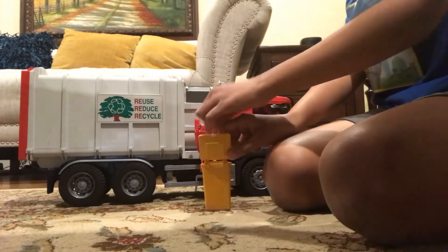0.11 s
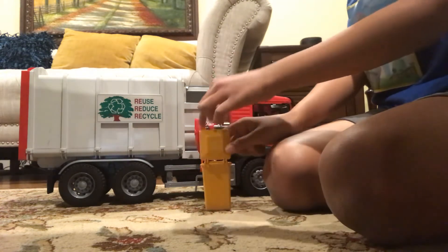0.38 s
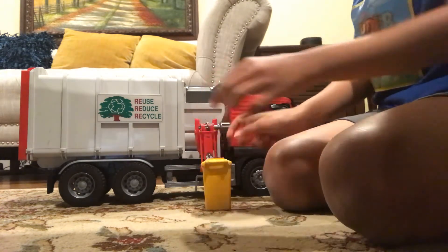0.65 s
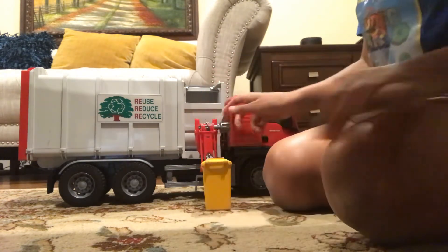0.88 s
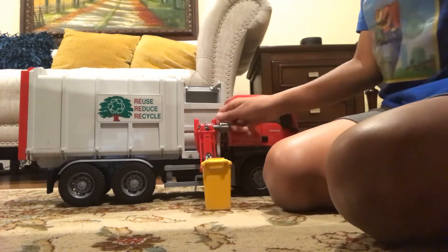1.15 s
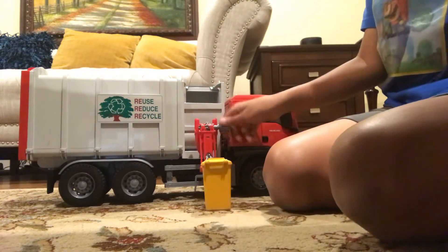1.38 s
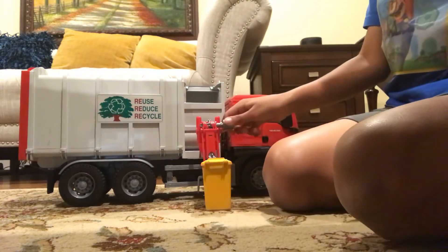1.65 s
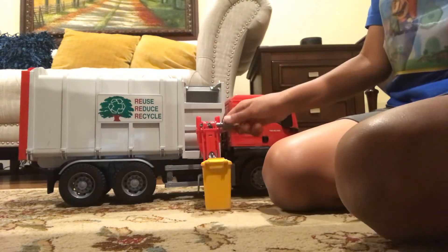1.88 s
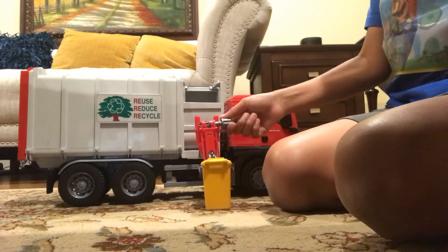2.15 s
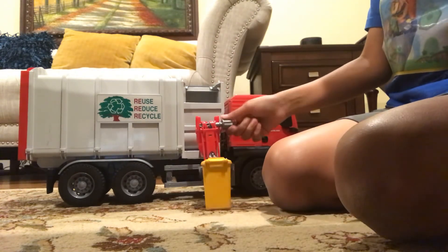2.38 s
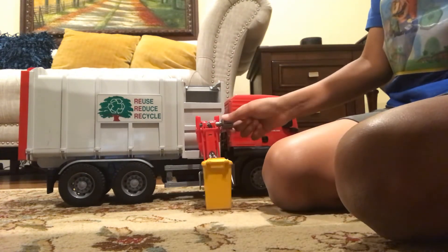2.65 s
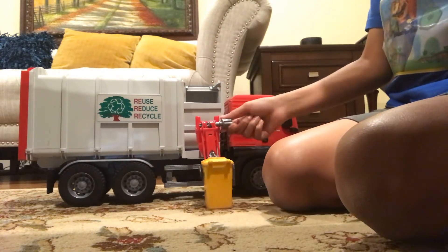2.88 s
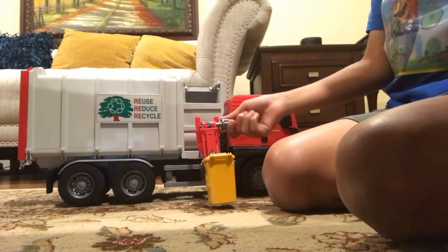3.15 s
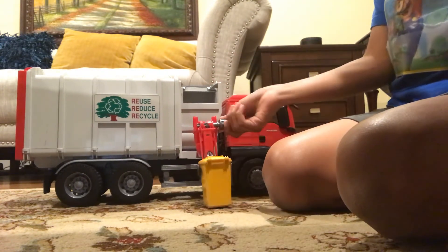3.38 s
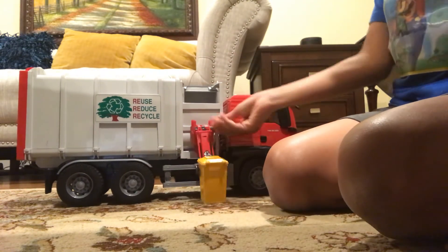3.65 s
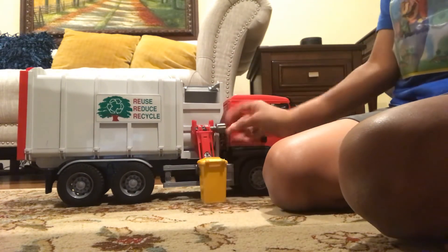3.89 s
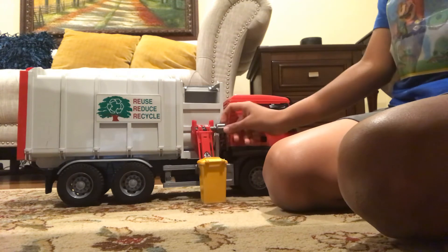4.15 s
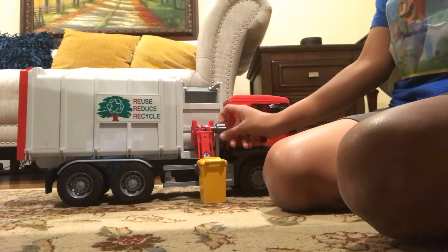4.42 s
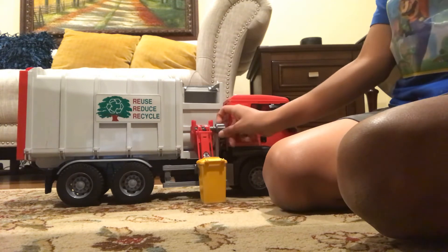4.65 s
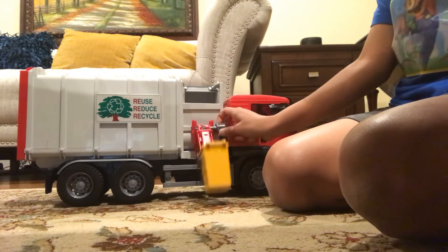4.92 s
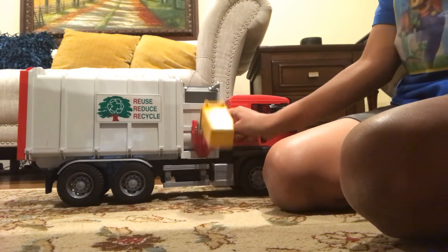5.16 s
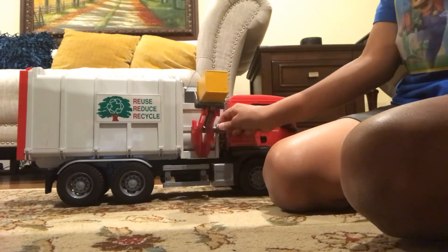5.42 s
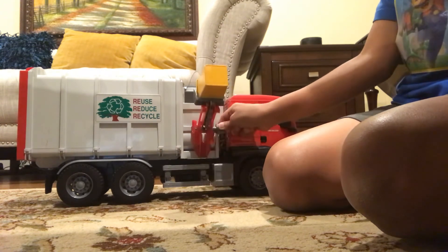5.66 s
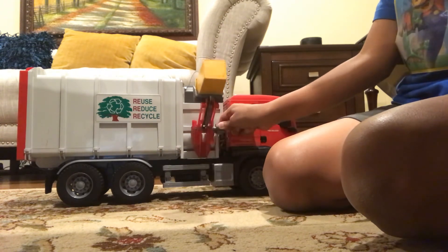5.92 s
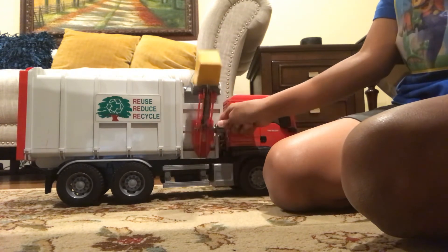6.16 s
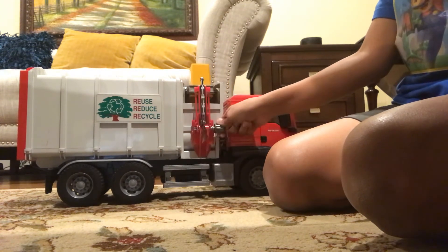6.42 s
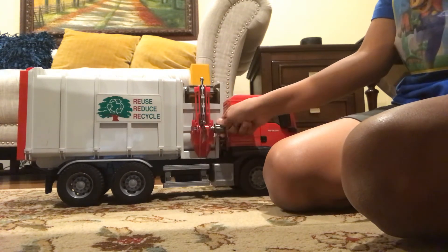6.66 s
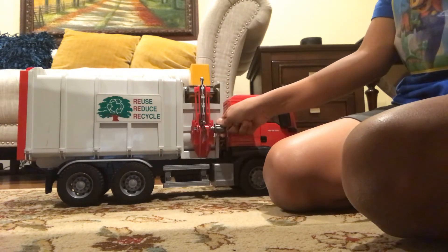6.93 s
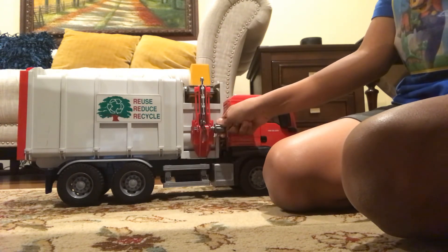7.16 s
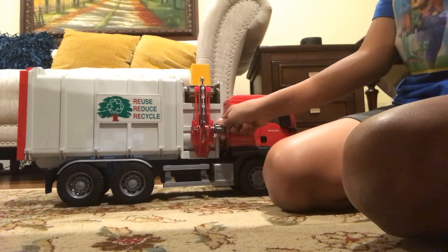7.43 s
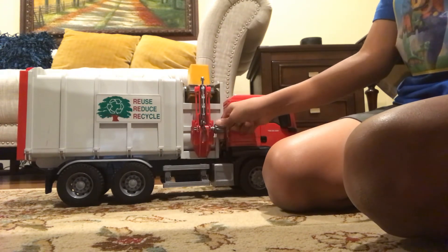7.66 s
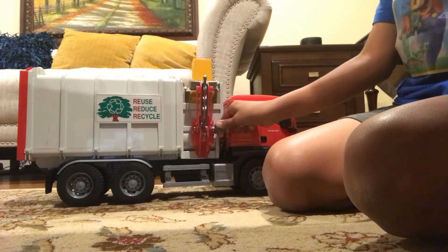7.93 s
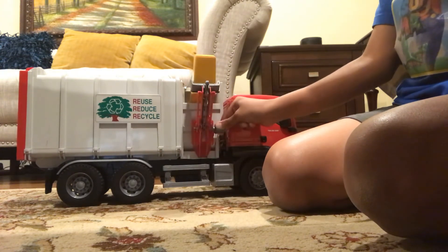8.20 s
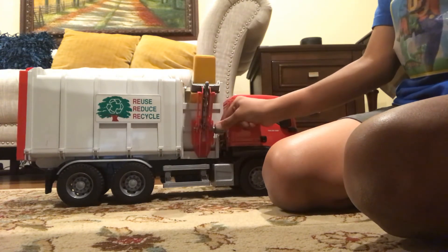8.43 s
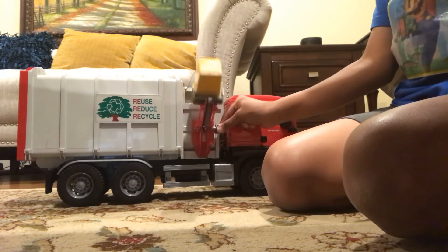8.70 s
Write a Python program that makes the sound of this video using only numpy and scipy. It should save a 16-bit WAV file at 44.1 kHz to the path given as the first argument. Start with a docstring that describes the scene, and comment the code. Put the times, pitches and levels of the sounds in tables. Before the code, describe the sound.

Quiet indoor hum, a faint squeak and lid snap, clusters of dry plastic knocks, then one loud bin slam on a hollow toy truck, and loose rattling.

```python
"""Room hum and hiss come first, then squeaks, a rattle and the snap of a lid, in a furnished living room.
A child works the lifting arm of a plastic toy refuse truck on a carpet: the arm knocks on the hollow body,
the bin slams on the hopper, loose pieces tick and slide; hands rub, with brief drones, pings and a thump.
Hits are runs of small contacts into decaying modes and noise cracks; rubs and drones are filtered noise.
The microphone hears the toy directly, over a softer room tail and steady noise."""
import sys
import numpy as np
from scipy import signal
from scipy.fft import rfft, irfft
from scipy.io import wavfile

SR = 44100
rng = np.random.default_rng(int(sys.argv[2]) if len(sys.argv) > 2 else 0)


def amplitude_ratio(level_db):
    """Convert a level in decibels to the matching linear amplitude (field) ratio."""
    exponent = np.asarray(level_db, float) / 20
    return 10 ** exponent


def transcribe(signal):
    """Save signal, clipped to [-1, 1], as a 16-bit WAV file at the path in sys.argv[1]."""
    frames = np.atleast_2d(signal).T
    limited = np.clip(frames, -1, 1)
    pcm = np.round(limited * 32767).astype(np.int16)
    wavfile.write(sys.argv[1], SR, pcm)


N = 388521

# Arm knocking on the truck. Each row: start in seconds, nominal peak in dB, hardness of the contact in dB.
KNOCKS = [(1.982, -52, -2), (2.032, -52, -5), (2.064, -37.5, -8.5), (2.645, -52, -2.5), (2.795, -48.5, 0),
          (2.833, -48.5, 6), (2.956, -44.5, 6.5), (3.198, -42.5, -3), (3.222, -41.5, 2), (3.267, -50.5, 1),
          (3.307, -38, 12), (3.399, -57.5, 11), (3.857, -42, -9.5), (3.873, -43.5, 3.5), (3.888, -34, 3),
          (3.928, -44, 5.5), (3.972, -28, 0.5), (3.981, -29, 8), (3.99, -33.5, 14), (4.101, -39.5, 5),
          (4.115, -44, 11), (4.14, -49.5, 3), (4.268, -43.5, -4), (4.42, -41.5, -7.5), (5.071, -50, -12),
          (5.159, -48.5, 2.5), (5.255, -60, 2.5), (5.701, -56.5, -8), (8.008, -55.5, -20),
          (8.161, -51.5, 0), (8.193, -50.5, -3), (8.488, -46.5, -4.5), (8.576, -47, -12.5)]
# Raised bin slamming on the hopper rim and bouncing. Each row: start in seconds, nominal peak in dB, hardness in dB.
SLAMS = [(6.612, -36.5, 9), (6.689, -15.5, 0.7), (6.712, -21.5, 0.6), (6.831, -21.5, -5), (6.853, -33.5, 2),
         (6.965, -47, -1.5)]
# Bin lid snapping shut and bouncing. Each row: start in seconds, nominal peak in dB, hardness in dB.
LID_SNAPS = [(0.668, -42, -1), (0.7438, -57, 0)]
# Single taps on the bin, set down and tipped. Each row: start in seconds, nominal peak in dB, hardness in dB.
BIN_TAPS = [(0.963, -39.5, 0), (6.101, -49.5, 6.5)]
# Ticks of the loose pieces. Each row: start in seconds, nominal peak in dB, hardness in dB.
TICKS = [(3.349, -60, 6), (5.8297, -62.5, -4), (5.898, -62.5, -16), (5.96, -60.5, -16), (6.004, -51.5, -1),
         (6.027, -60, 3), (6.0748, -55, 5), (6.093, -58.5, -2), (6.139, -48, 4), (6.157, -51.5, 4),
         (6.9431, -50, -11), (7.0502, -51, 0), (7.0608, -35.5, 10.5), (7.1098, -41.5, 9.5),
         (7.149, -53, -5), (7.1704, -43.5, 6), (7.199, -54, 8), (7.217, -57, 8), (7.232, -57, 0),
         (7.273, -62.5, 4), (7.334, -52.5, -6)]

# Modes; ring() lengthens any decay under 3 ms to 3 ms.
# Hollow body, arm and bin. Each row: frequency in Hz, relative level in dB, t60 in seconds.
BODY = [(218, 2.5, 0.057), (309, 1.5, 0.039), (425.3, -5.5, 0.13), (603.4, -9.5, 0.051),
        (720, -12.5, 0.062), (921, -17.5, 0.046), (1138, -17, 0.032), (1510, 0.5, 0.0067), (1840, 2, 0.019),
        (2380, 3, 0.0064), (2714, -15.5, 0.03), (3370, 3.5, 0.0022), (3820, 0.5, 0.015), (4590, 1.5, 0.011)]
# The lifting arm's own ring. Each row: frequency in Hz, relative level in dB, t60 in seconds.
ARM = [(1530, 1, 0.039), (1660, -9, 0.0053)]
# The hopper's own ring. Each row: frequency in Hz, relative level in dB, t60 in seconds.
HOPPER = [(618, -5, 0.032)]
# Lid. Each row: frequency in Hz, relative level in dB, t60 in seconds.
LID = [(1830, -16, 0.067), (2340, 0, 0.018), (3070, -9, 0.024), (4690, 6, 0.039), (5230, 0, 0.05),
       (5520, -4, 0.022)]
# Bin under single taps. Each row: frequency in Hz, relative level in dB, t60 in seconds.
BIN = [(345, -6.5, 0.02), (500, 2, 0.071), (608, -5, 0.037), (1530, -1.5, 0.073), (3330, -8.5, 0.035),
       (4750, -3, 0.024)]
# Loose pieces and thin bin walls. Each row: frequency in Hz, relative level in dB, t60 in seconds.
PIECES = [(740, 7.5, 0.0052), (1650, -11.5, 0.081), (1987, -12.5, 0.054), (2665, -12.5, 0.06),
          (4185, -4, 0.048), (4535, -8, 0.016), (5400, 7, 0.005), (5750, 1.5, 0.011), (8340, -6.5, 0.0025)]

# Spread of a hit over four registers, low to high.
# Each row: level beside the hit's peak in dB, share of the hardness that is added (a plain ratio).
KNOCK_COLOUR = [(-12.5, 0.037), (-1.5, 0.098), (-13, 0.95), (-28.5, 0.81)]
# Slams. Each row: level beside the peak in dB, share of hardness (a plain ratio).
SLAM_COLOUR = [(-16, 0.61), (-1.5, 0.24), (-11.5, 0.59), (-18.5, 1)]
# Lid snaps. Each row: level beside the peak in dB, share of hardness (a plain ratio).
LID_COLOUR = [(-53, 0), (-1, 0.15), (-15.5, 0.53), (-3, 0.95)]
# Bin taps. Each row: level beside the peak in dB, share of hardness (a plain ratio).
TAP_COLOUR = [(-12.5, -0.6), (-0.5, 1.55), (-12.5, -0.1), (-11.5, 3)]
# Ticks. Each row: level beside the peak in dB, share of hardness (a plain ratio).
TICK_COLOUR = [(-5.5, 0.032), (-1.5, 0), (-17, 0.87), (-7, 1)]

# Loose pieces sliding and rattling, first in the bin, from 6.6 s in the hopper.
# Each row: start in seconds, end in seconds, level in dB.
SLIDES = [(0.633, 0.85, -72.5), (5.78, 6.22, -75), (6.715, 6.837, -54.5), (6.6, 6.709, -55),
          (7.052, 7.284, -61)]
# Hands moving on the body. Each row: time in seconds, level of the rub in dB.
HANDLING = [(0, -80.5), (1.45, -82), (1.65, -59), (1.9, -74.5), (2.35, -75), (2.45, -61.5), (2.75, -73.5),
            (4.5, -65.5), (5.05, -72), (5.33, -56.5), (5.62, -67.5), (5.8, -60), (6.25, -59.5), (6.5, -80),
            (7.95, -79), (8.2, -57), (8.42, -91), (8.81, -69.5)]
# Brief narrow noises: squeaks, low rumbles, two pings of the arm at 1540 Hz, the slam's low thump.
# Each row: middle in seconds, frequency in Hz, level in dB, length in seconds.
DRONES = [(0.68, 1060, -79, 0.32), (0.823, 1110, -72, 0.049), (0.88, 1096, -68, 0.096),
          (1.636, 57, -47, 0.42), (2.676, 1540, -69, 0.044), (2.82, 1540, -63, 0.036),
          (3.561, 200, -53.5, 0.085), (5.497, 201, -51.5, 0.13), (6.857, 91, -52.5, 0.39),
          (8.228, 92, -55, 0.25), (2.103, 191, -50, 0.21), (6.717, 105.7, -41.5, 0.061)]
# Colour of room and microphone. Each row: frequency in Hz, relative level in dB per Hz.
ROOM_TONE = [(18, -37), (30, -6), (66, 7), (124, 6), (328, -6), (461, -12), (721, -12), (937, -17),
             (14400, -29), (16000, -24.5)]
# Course of the room tone. Each row: time in seconds, rms between 1 and 12 kHz in dB.
HISS = [(0, -78), (8.81, -76)]

BODY_EDGES_HZ = [160, 500, 1200, 3000, 10000]     # borders of the four registers
PIECE_EDGES_HZ = [600, 1200, 3500, 7000, 14000]   # the same for lid and pieces
FORCE_BRIGHTENS = 0.29   # dB gained in the top register for each dB above the mean hit
SPOT_DB = 2.5            # each blow lands elsewhere: spread of a mode's strength
HOPPER_FROM_S, HOPPER_T60_S = 6.6, 0.019   # from here the pieces lie in the hopper and ring no longer than this
LIGHT_BIN_DB = -37       # before that, the pieces lack its low register
# Each knock or slam shakes the truck in the hands: drive for a 0 dB hit, share of its dB, rise, fade.
SHAKE_DB, SHAKE_FOLLOWS, SHAKE_RISE_S, SHAKE_FADE_S = -41, 0.6, 0.022, 0.1
ROOM_T60_S, TREBLE_T60_S, WALL_CUT_HZ = 0.33, 0.17, 850   # decay below and above the wall cut
ROOM_DB = -6.5           # gain of the room tail
BLUR_HZ = 130            # rate of a random modulation that blurs narrow rings in the room tail


def in_time(rows):
    """Columns of a table as curves, one value a sample."""
    s, *columns = np.transpose(rows)
    return [np.interp(np.arange(N) / SR, s, c) for c in columns]


def rms_one(x):
    """Scale to rms 1."""
    return x / np.sqrt(np.mean(x ** 2) + 1e-20)


def band(x, low_hz, high_hz):
    """Second-order band-pass."""
    return signal.sosfilt(signal.butter(2, [low_hz, min(high_hz, .45 * SR)], "band", fs=SR, output="sos"), x)


def ring(clicks, hz, t60):
    """A unit click sets a decaying sine of initial height 1 ringing."""
    r = amplitude_ratio(-60 / (max(t60, .003) * SR))
    w = 2 * np.pi * hz / SR
    return signal.lfilter([0, np.sin(w)], [1, -2 * r * np.cos(w), r * r], clicks + 1e-18)


def drift(rate):
    """Slow random wander of rms 1."""
    r = np.exp(-2 * np.pi * rate / SR)
    noise = rng.standard_normal(N + SR)
    return rms_one(signal.lfilter([1], [1, -2 * r, r * r], noise)[SR:])   # the first second settles the filter


def swell(middle, length):
    """A smooth rise and fall."""
    return np.cos(np.pi * np.clip((np.arange(N) / SR - middle) / length, -.5, .5)) ** 2


def registers(hits, colour):
    """Times and four register levels of each hit: hardness recolours it, force brightens the top."""
    s, db, hard_db = np.transpose(hits)
    beside_db, share = np.transpose(colour)
    force_db = FORCE_BRIGHTENS * (db - db.mean())[:, None] * [0, 0, 0, 1]
    return s[:, None], db[:, None] + beside_db + share * hard_db[:, None] + force_db


def struck(hits, levels, modes, edges, chatter_s, crack_db, count, spread_db=SPOT_DB):
    """Each hit is a quick run of small contacts; every mode takes it with a strength of its own."""
    wait = np.sort(rng.exponential(1, (len(hits), count)), axis=1)
    wait -= wait[:, :1]
    longer = amplitude_ratio(.12 * (levels.max(axis=1, keepdims=True) + 36.5))   # stronger hits chatter longer
    at = ((hits + chatter_s * longer * wait) * SR).astype(int).clip(0, N - 1)
    uneven = amplitude_ratio(3.5 * rng.standard_normal(wait.shape))
    size = uneven * (0.5 + wait) * np.exp(-.8 * wait)   # contacts swell, then die
    size /= np.sqrt((size ** 2).sum(axis=1, keepdims=True))

    def contacts(db):
        """Clicks of random sign, each run scaled to its level."""
        clicks = size * amplitude_ratio(db)[:, None] * rng.choice([-1, 1], at.shape)
        return np.bincount(at.ravel(), clicks.ravel(), N)

    out = np.zeros(N)
    for hz, db, t60 in modes:
        register = np.clip(np.searchsorted(edges, hz) - 1, 0, 3)
        for twin in (1 - .016, 1, 1 + 0.012):   # uneven walls split each mode into a close cluster
            strength = levels[:, register] + db + spread_db * rng.standard_normal(len(hits))
            out += ring(contacts(strength), hz * twin, t60)
    # modes too dense and damped to tell apart: a broad crack
    for register, db in enumerate(crack_db):
        low, high = edges[register:register + 2]
        crack = band(contacts(levels[:, register] + db) + 1e-18, low, high)
        out += band(crack, low / 1.5, high * 1.5)
    return out


def arm_knocks():
    """The arm's contacts excite the hollow body and the arm itself."""
    return struck(*registers(KNOCKS, KNOCK_COLOUR), BODY + ARM, BODY_EDGES_HZ,
                  chatter_s=.009, crack_db=[37.3, 30.4, 12.0, 27.3], count=90)


def bin_slams():
    """The bin's contacts on the rim excite the body and the hopper."""
    return struck(*registers(SLAMS, SLAM_COLOUR), BODY + HOPPER, BODY_EDGES_HZ,
                  chatter_s=.009, crack_db=[32.0, 17, 22.0, 24.6], count=90)


def lid_snaps():
    """A short chatter of contacts excites the lid's modes."""
    return struck(*registers(LID_SNAPS, LID_COLOUR), LID, PIECE_EDGES_HZ,
                  chatter_s=0.0054, crack_db=[0, 9, 27, 14.0], count=30)


def bin_taps():
    """A few contacts in a very short run excite the bin's modes."""
    return struck(*registers(BIN_TAPS, TAP_COLOUR), BIN, BODY_EDGES_HZ,
                  chatter_s=0.0016, crack_db=[56, 10.0, 26.0, 14.0], count=4, spread_db=1.0)


def piece_ticks():
    """Small contacts ring the pieces: light in the bin, then damped where they lie in the hopper."""
    at, levels = registers(TICKS, TICK_COLOUR)
    early = at[:, 0] < HOPPER_FROM_S
    crack_db = [33.2, 26.5, 35.4, 3.6]
    damped = [(hz, db, min(t60, HOPPER_T60_S)) for hz, db, t60 in PIECES]
    in_bin = struck(at[early], levels[early] + [LIGHT_BIN_DB, 0, 0, 0], PIECES, PIECE_EDGES_HZ,
                    chatter_s=0.0036, crack_db=crack_db, count=60)
    in_hopper = struck(at[~early], levels[~early], damped, PIECE_EDGES_HZ,
                       chatter_s=.004, crack_db=crack_db, count=60)
    return in_bin + in_hopper


def sliding(per_s):
    """Dense uneven clicks into the modes of the pieces; each mode comes and goes as the pieces turn."""
    clicks = (rng.random(N) < per_s / SR) * rng.standard_normal(N) * amplitude_ratio(3.0 * drift(25))
    rings = sum(ring(clicks * amplitude_ratio(5.0 * drift(12)) / np.sqrt(hz), hz, t60) for hz, _, t60 in PIECES[1:])
    scrape = band(clicks, 1200, 8000)
    rattle = rms_one(rms_one(rings) + amplitude_ratio(-1.5) * rms_one(scrape))
    t = np.arange(N) / SR
    # each slide fades in and out at up to full height over 56 ms
    return rattle * sum(amplitude_ratio(db) * np.clip(np.minimum(t - a, b - t) / 0.056, 0, 1) for a, b, db in SLIDES)


def shaking():
    """Level of the rub that swells and fades after every knock and slam."""
    s, db, _ = np.transpose(KNOCKS + SLAMS)
    jolts = np.bincount((s * SR).astype(int), amplitude_ratio(SHAKE_DB + SHAKE_FOLLOWS * db), N)
    t = np.arange(SR) / SR
    rise_and_fade = (1 - np.exp(-t / SHAKE_RISE_S)) * np.exp(-t / SHAKE_FADE_S)
    return signal.fftconvolve(jolts, rise_and_fade)[:N]


def handling():
    """Skin and joints rub the body in lumps: its low modes over a broad scuff."""
    grip = rng.standard_normal(N) * amplitude_ratio(4.5 * drift(18))
    rub = sum(amplitude_ratio(db) * rms_one(ring(grip, hz, t60)) for hz, db, t60 in BODY[:7])
    scuff = band(grip, 50, 425)
    level = amplitude_ratio(in_time(HANDLING)[0]) + shaking()
    return level * rms_one(rms_one(rub) + amplitude_ratio(-10.5) * rms_one(scuff))


def drones(t60):
    """Noise through one resonance: a thin squeak or ping when high, a loose rumble or thump when low."""
    noise = rng.standard_normal(N)
    return sum(amplitude_ratio(db) * swell(s, length) * rms_one(band(ring(noise, hz, t60), hz / 2, hz * 2))
               for s, hz, db, length in DRONES)


def living_room(x):
    """A diffuse tail that builds up in a few ms; carpet and cushions swallow the treble first."""
    t = np.arange(SR // 2) / SR
    noise = rng.standard_normal(len(t)) * (1 - np.exp(-t / 0.0075))
    low = signal.lfilter(*signal.butter(2, WALL_CUT_HZ, fs=SR), noise)
    tail = low * amplitude_ratio(-60 * t / ROOM_T60_S) + (noise - low) * amplitude_ratio(-60 * t / TREBLE_T60_S)
    return signal.fftconvolve(x, tail / np.sqrt(np.sum(tail ** 2)))[:N]


def room_tone():
    """Steady noise with the colour of room and microphone."""
    hz = np.fft.rfftfreq(N, 1 / SR)[1:]
    at, db = np.transpose(ROOM_TONE)
    colour = np.append(0, amplitude_ratio(np.interp(np.log(hz), np.log(at), db)))
    noise = irfft(rfft(rng.standard_normal(N)) * colour, N)
    return amplitude_ratio(in_time(HISS)[0]) * noise / np.sqrt(np.mean(band(noise, 1000, 12000) ** 2))


def scene():
    """The toy heard directly and by way of the room, with handling, drones and room tone."""
    toy = arm_knocks() + bin_slams() + lid_snaps() + bin_taps() + piece_ticks() + sliding(per_s=1500)
    blurred = toy * np.tanh(2 * drift(BLUR_HZ))
    room = amplitude_ratio(ROOM_DB) * living_room(blurred)
    return (toy + room + handling() + drones(t60=0.07) + room_tone())[None]


def band_limit(x):
    """A steep low-pass at the top of the band."""
    return signal.sosfilt(signal.butter(12, 16430, fs=SR, output="sos"), x)


def record(dry):
    """The microphone cuts the deep bass and the very top."""
    no_bass = signal.sosfilt(signal.butter(5, 50, "high", fs=SR, output="sos"), dry)
    mix = signal.sosfilt(signal.cheby2(10, 50, 16200, fs=SR, output="sos"), no_bass)
    return band_limit(mix)


dry = scene()
out = record(dry)
transcribe(out)
```